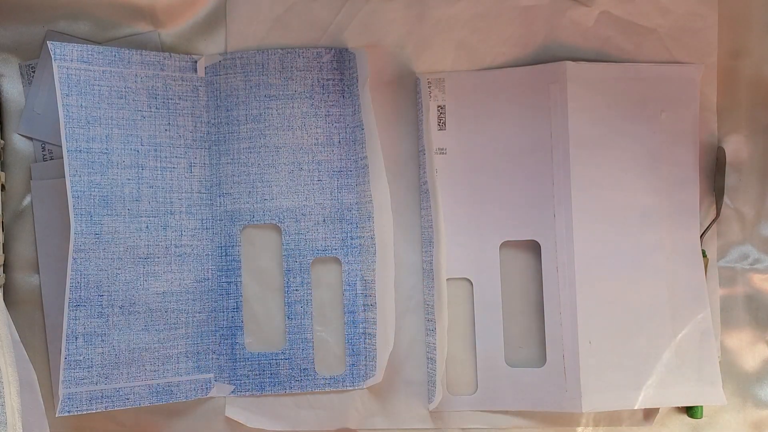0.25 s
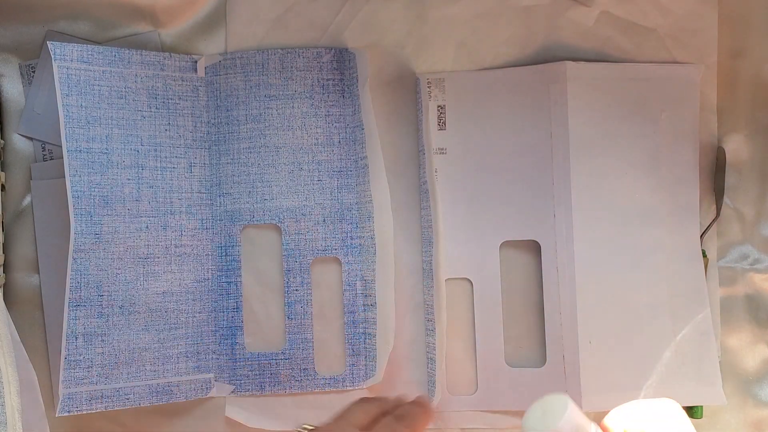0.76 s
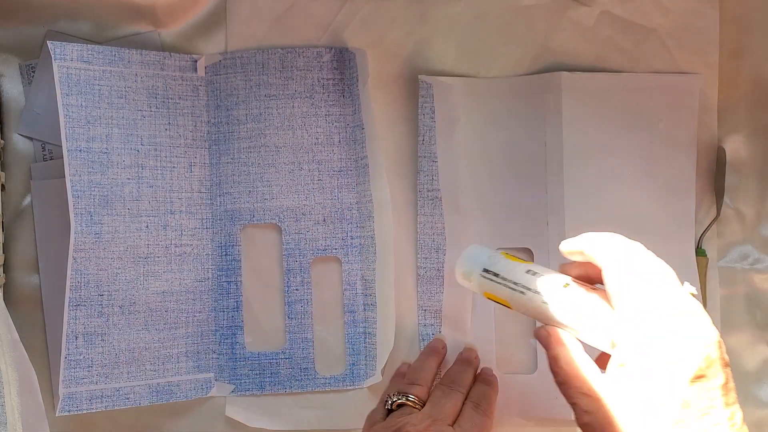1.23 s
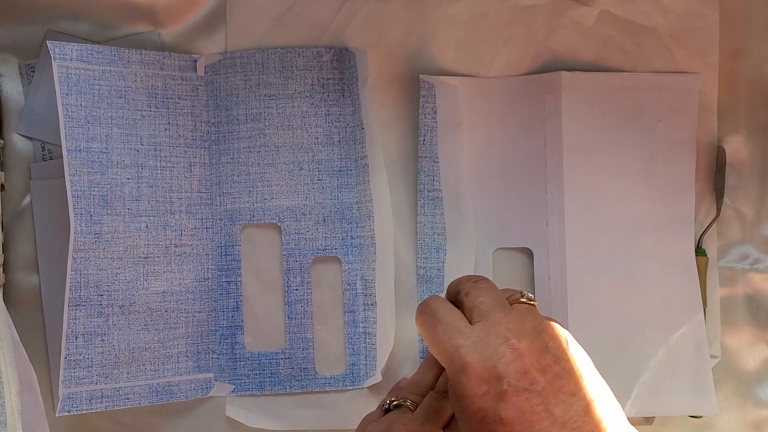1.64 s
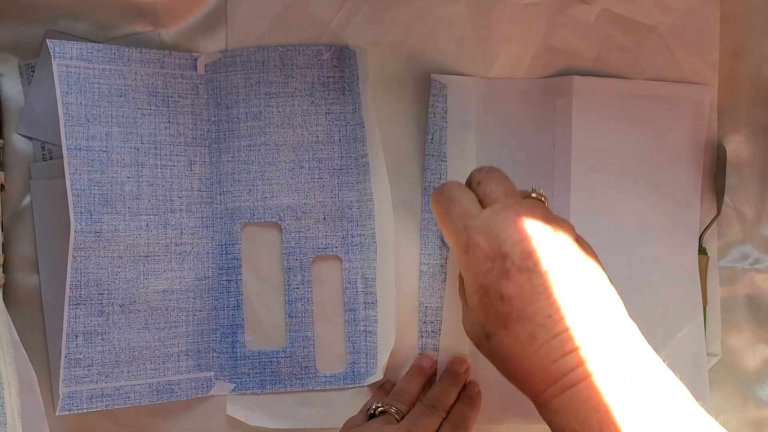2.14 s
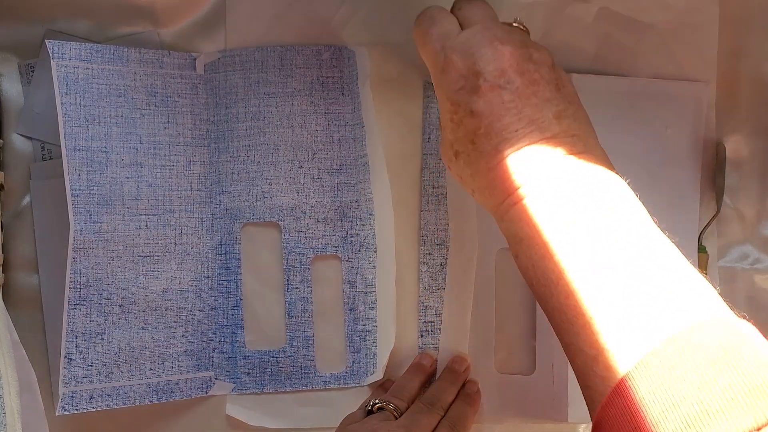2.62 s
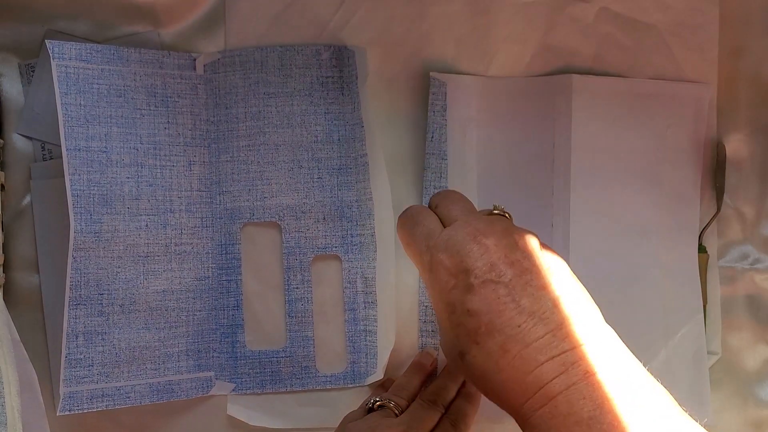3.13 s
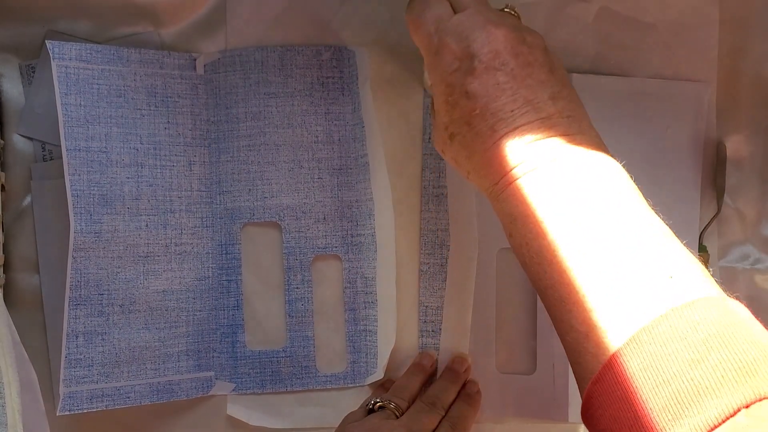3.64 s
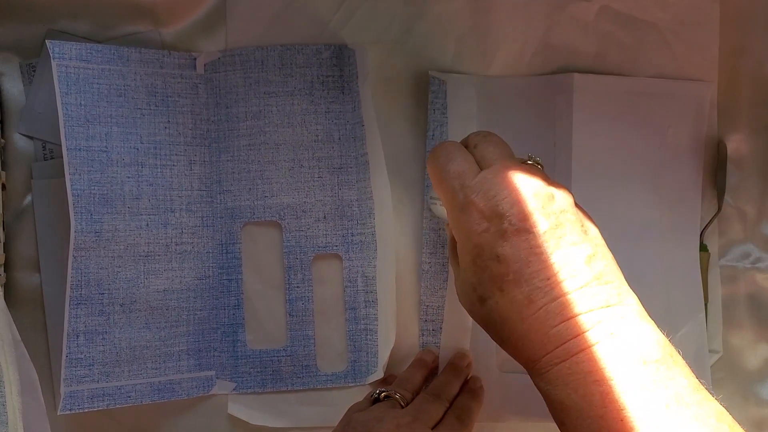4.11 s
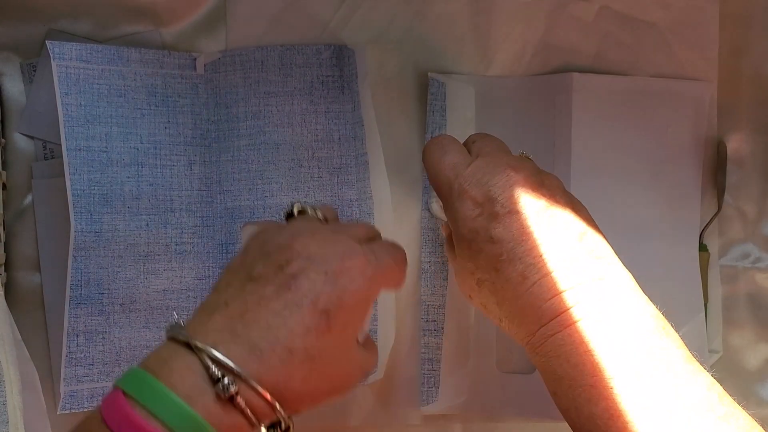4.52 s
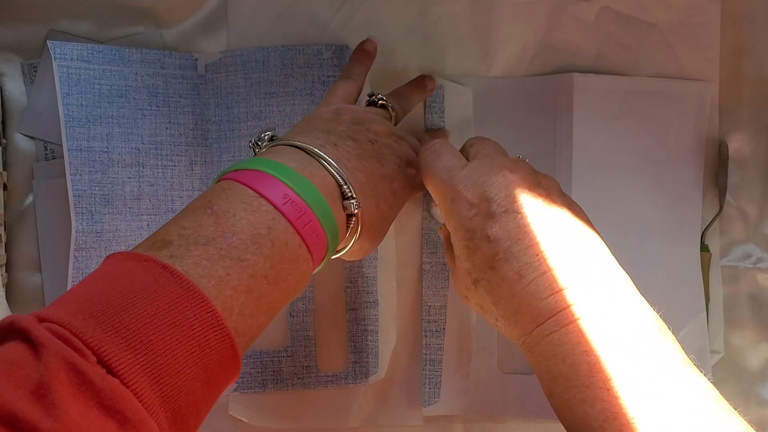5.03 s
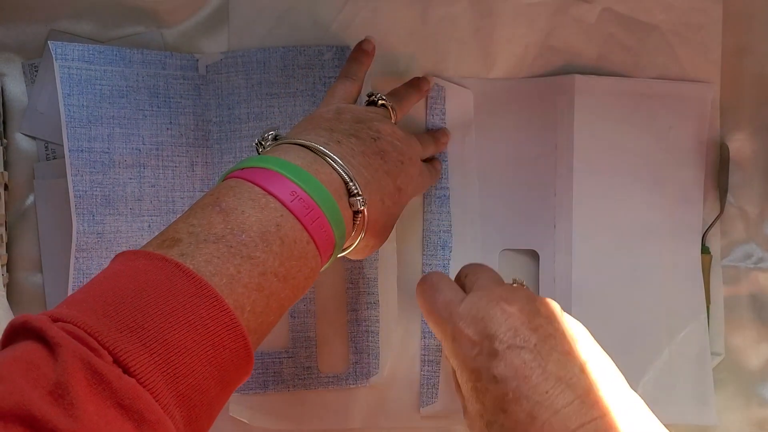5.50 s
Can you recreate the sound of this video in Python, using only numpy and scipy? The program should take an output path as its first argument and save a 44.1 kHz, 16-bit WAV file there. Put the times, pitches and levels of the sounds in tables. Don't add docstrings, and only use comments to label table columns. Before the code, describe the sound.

A glue stick is picked up and drawn along an envelope flap. First come faint paper ticks, a hollow plastic tap and a burst of dry crackling, then scuffs, cloth dragging softly on the table, hard glue clicks, and deep soft thumps as hands land. The sound is close, stereo and dry, with short small-room reflections and a low background hum.

```python
import sys
import numpy as np
from scipy import signal
from scipy.io import wavfile
from scipy.ndimage import uniform_filter1d

SR = 44100
rng = np.random.default_rng(int(sys.argv[2]) if len(sys.argv) > 2 else 0)


def put_to_file(sound):
    columns = np.atleast_2d(sound).T
    safe = np.clip(columns, -1, 1)
    whole_steps = np.round(safe * 32767)
    wavfile.write(sys.argv[1], SR, whole_steps.astype(np.int16))


def convert_level_to_amplitude(level_db):
    exponent = np.asarray(level_db, float) / 20
    return 10 ** exponent


N = 254076

# frequency [Hz], density [dB per Hz].
PAPER_BODY = [(240, -48), (400, -22.5), (895, -24), (1510, -9), (1950, -9), (2280, -8.5), (3130, -5.5),
              (4320, -8), (5790, -7), (8500, -15.5), (11000, -36), (18700, -120)]
# frequency [Hz], density [dB per Hz].
FIBRE_TREBLE = [(4410, -26), (7500, -3), (9220, -12.5), (12700, -5.5), (13900, -7), (15100, -5),
                (16000, -4.5)]

# start [s], length [s], level [dB], treble against the level [dB].
SLIDES = [
    (0.0, 0.13, -73.5, 13),
    (0.497, 0.37, -73, 16),
    (0.91, 0.39, -58, -1.5),
    (2.135, 0.24, -60.5, -11),
    (4.3, 0.75, -70.5, -10),
]
SLIDE_IDLE_DB, SLIDE_IDLE_TREBLE_DB, SLIDE_LOWS_DB = -76, -70.5, -74.5
# start [s], length [s], level [dB], centre [Hz], width [Hz].
SMEAR = (3.5, 1, -78.5, 545, 192)

# start [s], length [s], level [dB].
DRAGS = [
    (0.607, 1.11, -61),
    (1.944, 1.38, -69),
    (4.15, 1.136, -62.5),
]
DRAG_IDLE_DB = -75.5
# frequency [Hz], width [Hz], level [dB].
HOLLOW = [(299.6, 26.4, 8), (250, 55, -17), (385, 92, 0), (2400, 180, -5), (1100, 165, -11)]

# frequency [Hz], density [dB per Hz].
AIR = [(15, -31), (25, -10), (59, -2), (175, -11.5), (217, -11.5), (300, -9.5), (800, -22), (1260, -21),
       (2100, -22.5), (7070, -16), (8320, -50), (9780, -34), (11800, -17.5), (15900, -26)]
AIR_DB = -62
# frequency [Hz], width [Hz], height [dB].
PORT_WHINE = [(12000, 295, 1.5), (15520, 610, 9.5)]
HUM_HZ, HUM_DB = 173.2, -72.5
HUM_START_DB, HUM_RISE_S, HUM_SWELL_DB, HUM_SWELL_S = -14.5, 1.2, 1.5, 2.0
# frequency [Hz], left-right likeness [clipped to -1 to
LIKENESS = [(60, 0.98), (150, 0.25), (380, 0.5), (950, -5.5), (2380, -1), (5980, -0.12), (15000, -0.13)]

# time [s], left against right [dB].
HANDS = [(0.0, 0.5), (0.21, 5), (0.24, -2), (0.71, 3), (1.19, 0), (1.52, 4), (1.89, -2), (1.97, -3),
         (2.09, 0.5), (3.91, -0.5), (3.96, 3.5), (4.04, 2), (4.81, 4), (5.76, 0.5)]
RING_T60, RING_LEFT_DB = 0.025, -14

# time [s], peak [dB], ring [Hz], treble [dB].
SNAPS = [(0.0937, -38, 6850, -4), (0.173, -44, 7040, 5), (0.2353, -44.5, 6660, -7), (0.331, -60, 7420, 18),
         (0.613, -33.5, 7600, 10), (0.8098, -38, 5260, 10), (0.8591, -36.5, 7000, 6.5),
         (0.9455, -38.5, 4300, 1), (2.4612, -36.5, 4370, -6), (4.646, -39.5, 6360, 0.5),
         (4.697, -47.5, 6460, 10), (4.7283, -39.5, 6900, 2), (4.786, -43.5, 6200, 4),
         (5.135, -51, 6030, -1), (4.885, -56.5, 5000, 11.5), (4.989, -42.5, 7100, -3)]
SNAP_T60 = 0.12
# time [s], peak [dB], ring [Hz].
FIBRES = [
    (0.539, -34, 4540),
    (0.5478, -32.5, 4500),
    (0.576, -40, 6960),
    (0.624, -34, 5150),
    (0.6446, -45, 7220),
    (0.6613, -39.5, 7110),
]
FIBRE_TREBLE_DB, FIBRE_T60 = 10.5, 0.056
# time [s], peak [dB], ring [Hz],
# treble [dB], crackle t60 [s].
MIXED_TICKS = [
    (0.4265, -27.5, 2500, -3, 0.045),
    (2.3612, -17.5, 3260, -29, 0.072),
    (3.6968, -26, 1770, -26, 0.022),
    (2.4, -36, 1540, -30, 0.081),
               (0.531, -27, 5200, 0, 0.03), (0.5875, -38, 7000, 8, 0.04), (0.650, -40, 7000, -2, 0.02),
          (0.6655, -37, 7200, 6, 0.03), (0.9752, -44, 5830, 8, 0.08), (1.0326, -36, 5460, 3, 0.05),
          (1.1408, -38, 5500, -1, 0.05), (1.197, -54, 2200, -15, 0.04), (1.3334, -48, 3930, 0, 0.06),
          (1.4541, -51, 6950, 7, 0.04), (2.164, -30, 5800, -2, 0.02), (2.18, -32, 5500, 4, 0.02),
          (2.2302, -19.5, 3220, -26.5, 0.02), (2.355, -28, 7200, -8, 0.015), (2.364, -10, 5160, -23, 0.024),
          (3.1346, -46, 2040, -25, 0.05), (3.256, -33, 3300, -16, 0.024), (3.701, -30, 3060, -3, 0.02),
          (3.807, -41, 1740, -12, 0.02), (3.82, -38, 2900, -8, 0.028), (4.402, -38, 5000, -12, 0.02),
          (4.417, -38, 4000, -15, 0.02), (5.48, -38, 4500, -15, 0.02), (5.529, -49.5, 1030, -30, 0.04),
          (5.58, -50, 1300, -30, 0.027), (0.027, -42, 6500, -8, 0.087), (0.193, -49, 7400, 4, 0.03)]

# time [s], peak [dB], ring [Hz], treble [dB], crackle t60 [s].
TUBE = [
    (.397, -25, 1880, -26, 0.0089),
    (.3975, -24, 2580, -27, 0.025),
    (3.9624, -38.5, 2450, -21, 0.05),
    (3.9635, -45, 1220, -28, 0.065),
    (5.6185, -41, 1110, -30, 0.04),
    (3.2525, -25, 1400, -25, 0.025),
    (1.787, -44, 1330, -30, 0.04),
    (1.806, -44, 1300, -30, 0.04),
]

# time [s], peak [dB], ring [Hz], treble against the peak [dB],
# crackle t60 [s].
CRACKS = [(0.4451, -20, 6000, 7, 0.019), (0.449, -9, 2850, -1, 0.053), (2.3465, -25, 5300, -1.5, 0.13),
          (2.1588, -17.5, 5200, -4, 0.11), (2.2266, -6.5, 3190, -24, 0.036),
          (2.3638, -14, 3260, -25, 0.048), (3.2436, -21, 2930, -16, 0.072),
          (3.6968, -24, 3080, -0.5, 0.038), (2.6718, -34.5, 5700, -4.5, 0.14),
          (3.5757, -36, 6400, -38, 0.05), (4.379, -23.5, 4470, -12, 0.056),
          (4.7805, -36.5, 6440, 9.5, 0.03)]
# time [s], peak [dB], ring [Hz], treble [dB], crackle t60 [s].
RIMS = [
    (1.9872, -31, 2000, -45, 0.089),
    (2.5308, -37, 2270, -7, 0.054),
    (5.5213, -36, 4200, -8, 0.03),
    (5.6173, -30.5, 3480, -33, 0.033),
]

# time [s], peak [dB], upper mode against lower [dB], knock [dB], t60 [s].
THUMPS = [(0.447, -35.5, 9, -3.5, 0.13), (0.495, -32, 11, -9.5, 0.06), (1.209, -51.5, 0, -9, 0.41),
          (1.272, -46.5, 27, -3.5, 0.24), (1.295, -45.5, 14, -29, 0.24), (1.367, -54.5, -11, -12, 0.22),
          (1.873, -48, -5, -5.5, 0.1), (3.247, -46.5, -29, -5, 0.1), (3.788, -52.5, -10, -24, 0.2),
          (4.358, -46.5, 10, -8, 0.11), (4.423, -42.5, -15, -27, 0.17), (4.532, -43.5, 6, -16, 0.069),
          (4.784, -47.5, -26, -3, 0.16)]
# time [s], peak [dB], upper mode [dB], lower mode [Hz], t60 [s].
LANDINGS = [
    (1.653, -29.5, 1.5, 73.5, 0.22),
    (3.1438, -24, -7, 78, 0.17),
    (4.229, -23, 4.5, 60.8, 0.19),
]
PALM_HZ, LANDING_KNOCK_DB = 290, -20
# time [s], knock [dB], knock [Hz].
RAPS = [(0.503, -42.5, 535), (2.226, -54, 314), (2.357, -42, 293), (3.141, -37, 430), (3.697, -48.5, 316),
        (3.82, -54.5, 322), (4.175, -38, 520), (4.23, -53, 480), (4.604, -57, 250), (4.988, -54, 297),
        (5.304, -48.5, 398), (5.468, -44, 570), (5.615, -41, 780)]
RAP_KNOCK_DB, RAP_T60 = 17.5, 0.17
TABLE_HZ = 71.6, 110.1, 156

# start [s], length [s], level [dB], treble against the level [dB].
FLEXES = [
    (0.46, 0.26, -63, 8),
    (0.8, 0.1, -68, 7),
    (0.95, 0.2, -65, 1),
    (1.15, 0.22, -67, -8),
    (1.76, 0.08, -65, -6),
    (3.62, 0.22, -68, -8),
    (4.34, 0.09, -62, -8),
    (4.63, 0.2, -71, 4),
]
CREASES_PER_S, CREASE_SPREAD_DB, CREASE_S = 400, 2.6, 0.0012

# time [s], peak [dB], ring [Hz], treble against the peak [dB],
# t60 [s].
SCUFFS = [(0.4928, -28, 1420, 4.5, 0.098), (0.5244, -27, 5660, -12, 0.22), (0.5368, -30, 4600, 1, 0.1),
          (0.5764, -38, 6960, 6.5, 0.16), (0.6246, -44, 5200, 9, 0.22), (0.6404, -27, 7700, -1.5, 0.2),
          (0.826, -42, 5420, 1, 0.11), (0.9645, -39.5, 5820, -4, 0.28), (1.027, -34.5, 2680, 0.5, 0.17),
          (1.1405, -36.5, 3330, -10, 0.19), (1.04, -40, 1310, -18, 0.094), (1.19, -39.5, 2040, -20, 0.26),
          (1.2341, -42, 1160, -2, 0.29), (1.3337, -45, 1680, 2, 0.18), (1.4795, -41, 6960, -13, 0.11),
          (1.7629, -38.5, 5770, -6, 0.33), (1.779, -36.5, 1370, -6, 0.087), (1.786, -36, 6000, -10, 0.1),
          (1.798, -41, 1330, -20, 0.14), (3.243, -27, 2470, -17, 0.029), (3.8047, -37.5, 1790, -11, 0.057),
          (4.3444, -41, 3520, -8.5, 0.15), (4.3844, -28, 4320, -27, 0.073)]

# time [s], peak [dB], ring [Hz], crackle t60 [s].
TACKS = [(1.868, -38.5, 1780, 0.046), (1.895, -46.5, 1500, 0.025), (2.1096, -40, 5040, 0.085),
         (2.1224, -42.5, 3300, 0.4), (2.485, -50.5, 1650, 0.16), (2.598, -49.5, 1600, 0.18),
         (2.688, -46.5, 1140, 0.15), (2.7425, -42, 1870, 0.14), (2.8578, -40.5, 3160, 0.15),
         (3.1475, -38, 1920, 0.092), (3.2165, -48.5, 3250, 0.4), (3.349, -45, 5250, 0.15),
         (3.4323, -46, 1820, 0.12), (3.4537, -49, 1820, 0.1), (3.5956, -46, 1670, 0.033),
         (3.641, -46.5, 1770, 0.11), (3.6614, -40, 1100, 0.16), (3.675, -46, 1310, 0.038),
         (3.788, -36, 1080, 0.11), (3.823, -47, 1780, 0.04), (3.9048, -56, 2320, 0.065),
         (4.359, -36, 3600, 0.2), (4.606, -53, 1070, 0.14), (4.913, -54, 2350, 0.03),
         (4.955, -51, 1010, 0.26), (5.109, -65, 1054, 0.07), (5.237, -57, 1530, 0.059),
         (5.3047, -49, 1930, 0.035), (5.5558, -46.5, 1260, 0.073)]
TACK_TREBLE_DB, TACK_TREBLE_DB_PER_OCTAVE = -6, 4.5
# time [s], peak [dB], ring [Hz], crackle t60 [s].
DABS = [(2.2058, -32, 2800, 0.04), (3.0982, -43, 2120, 0.12), (3.6288, -52, 1790, 0.077),
        (3.7724, -46, 3200, 0.061), (4.167, -34.5, 2230, 0.055), (4.1755, -28, 1700, 0.056),
        (4.2297, -43, 1500, 0.089), (4.243, -29.5, 2170, 0.056), (4.262, -43, 3000, 0.032),
        (5.369, -51, 3270, 0.062), (5.462, -28.5, 3430, 0.045), (5.4724, -30.5, 3560, 0.048)]
DAB_TREBLE_DB = -43

# frequency [Hz], t60 [s].
ROOM = [(200, 0.216), (1000, 0.16), (4000, 0.14), (12000, 0.18)]
ROOM_DB, NEAR_DB, PATHS_PER_S = -4.5, -11.5, 7
# frequency [Hz],
# gain [dB].
RESPONSE = [(20, -22), (45, 3.5), (70, 3), (810, -1), (930, -3), (1100, -0.5), (7700, -8), (8300, -13.5),
            (10200, -7.5), (11200, -6), (15700, -3), (16200, -27), (22050, -16)]
RIGHT_TREBLE_DB = 3

TICK = dict(rise=0.00043, front_db=-2.5, crack_db=-12.0, spread_db=3.0, ring_db=-3.0, sharp=8.0,
            apart=0.76, creak_db=-7.0)
CRACK = dict(rise=0.0004, front_db=1.5, crack_db=14.0, spread_db=2.5, ring_db=-0.5, sharp=5.5,
             apart=1.0, creak_db=-7.0)
TAP = dict(rise=0.0024, front_db=2.5, crack_db=-22, spread_db=1.0, ring_db=15, sharp=9.5,
           apart=0.38, creak_db=-18.0)
RUB = dict(rise=0.012, front_db=-41, crack_db=-17.0, spread_db=1.0, ring_db=-8.5, sharp=6.6,
           apart=1.0, creak_db=-4.0)


def evened(x):
    return x / np.sqrt(np.mean(x ** 2) + 1e-20)


def read(points, hz):
    f, value = np.transpose(points)
    return np.interp(np.log(hz + 1), np.log(f + 1), value)


def add(mix, s, sound):
    part = mix[..., round(s * SR):][..., :sound.shape[-1]]
    part += sound[..., :part.shape[-1]]


def colour(x, points, tilt_db=0):
    hz = abs(np.fft.fftfreq(4096, 1 / SR))
    below = np.maximum(np.log2(points[0][0] / (hz + 1)), 0)
    above = np.maximum(hz / points[-1][0] - 1, 0) * 10
    tilt = np.clip(tilt_db, -7, 9) * np.log2(np.clip(hz, 600, 9000) / 2500)
    gain_db = np.maximum(read(points, hz) - 20 * (below + above) + tilt, -100)
    log_gain = gain_db * np.log(10) / 20
    taps = np.fft.ifft(np.exp(np.conj(signal.hilbert(log_gain)))).real
    return signal.fftconvolve(np.atleast_2d(x), taps[None, :2048], axes=1)[:, :x.shape[-1]]


def resonate(x, hz, width):
    r = np.exp(-np.pi * width / SR)
    return 2 * signal.lfilter([1 - r], [1, -r * np.exp(2j * np.pi * hz / SR)], x).real


def stroke_of(start, length, edge):
    u = (np.arange(N) / SR - start) / length
    return np.sin(np.pi / 2 * np.clip(np.minimum(u, 1 - u) / edge, 0, 1)) ** 2


def grit(n, spread_db, apart=0):
    clumps = np.repeat(rng.exponential(1, n // 24 + 1), 24)[:n]
    fibres = rng.standard_normal(n) + apart * rng.standard_normal((2, n))
    return evened(fibres * convert_level_to_amplitude(spread_db * np.minimum(clumps, 4)))


def spread(magnitude):
    a, b, c, d = rng.standard_normal((magnitude.shape[1], 1025, 4)).T
    same = np.clip(read(LIKENESS, np.fft.rfftfreq(2048, 1 / SR)), -1, 1)[:, None]
    left = a + 1j * b
    right = same * left + np.sqrt(1 - same ** 2) * (c + 1j * d)
    z = np.array([left, right]) * magnitude
    return evened(signal.istft(z, nperseg=2048, noverlap=1536)[1][:, :N])


def slide():
    level, treble = convert_level_to_amplitude(SLIDE_IDLE_DB), convert_level_to_amplitude(SLIDE_IDLE_TREBLE_DB)
    for s, length, db, up_db in SLIDES:
        level = level + convert_level_to_amplitude(db) * stroke_of(s, length, 0.46)
        treble = treble + convert_level_to_amplitude(db + up_db) * stroke_of(s, length, 0.5)
    drive = grit(N, 2.8, apart=1.0)
    body = evened(colour(drive, PAPER_BODY))
    lows = evened(resonate(drive, 1020, 1200))
    start, length, db, hz, width = SMEAR
    smeared = evened(resonate(resonate(drive, hz, width), hz, width))
    smear = convert_level_to_amplitude(db) * stroke_of(start, length, 0.35) * smeared
    fibres = evened(colour(drive, FIBRE_TREBLE))
    return level * body + treble * fibres + convert_level_to_amplitude(SLIDE_LOWS_DB) * lows + smear


def sleeve():
    drag = spread(np.ones((1025, N // 512 + 5))) + 1.04 * rng.standard_normal(N)
    hollow = sum(convert_level_to_amplitude(db) * resonate(drag, hz, width) / np.sqrt(width) for hz, width, db in HOLLOW)
    level = convert_level_to_amplitude(DRAG_IDLE_DB) + sum(convert_level_to_amplitude(db) * stroke_of(s, length, 0.3) for s, length, db in DRAGS)
    return level * evened(hollow)


def air():
    patches = rng.standard_normal((N // 512 + 5, 1025)).T
    patches = uniform_filter1d(patches, size=20, axis=0)
    patches = evened(uniform_filter1d(patches, size=6, axis=1))
    bins_hz = np.fft.rfftfreq(2048, 1 / SR)
    whine_db = sum(db * np.exp(-((bins_hz - hz) / width) ** 2) for hz, width, db in PORT_WHINE)
    shape_db = read(AIR, bins_hz) + whine_db
    noise = spread(convert_level_to_amplitude(shape_db[:, None] + 1.83 * patches))
    t = np.arange(N) / SR
    waver = 0.3 * evened(resonate(rng.standard_normal(N), HUM_HZ, 6))
    hum = evened(np.sin(2 * np.pi * HUM_HZ * t) + waver)
    rise_db = HUM_START_DB * np.maximum(1 - t / HUM_RISE_S, 0)
    swell_db = HUM_SWELL_DB * np.cos(2 * np.pi * (t - 2.57) / HUM_SWELL_S)
    return convert_level_to_amplitude(AIR_DB) * noise + convert_level_to_amplitude(HUM_DB + rise_db + swell_db) * hum


def paper(drive, damped, hz, treble_db, tilt_db, ring_db, sharp):
    body = colour(drive, PAPER_BODY, tilt_db)
    dull_db = np.clip(-0.2 * (treble_db + 13.0), 0, 3.5)
    width = hz / sharp
    push = body * damped
    rings = resonate(push, hz, width) + convert_level_to_amplitude(-14.0) * resonate(push, 1.67 * hz, width)
    low = evened(body) + convert_level_to_amplitude(ring_db + dull_db) * evened(rings)
    return evened(low) + convert_level_to_amplitude(treble_db) * evened(colour(drive, FIBRE_TREBLE))


def contacts(rows, lean_db, lean_db_per_octave, rise, front_db, crack_db, spread_db, ring_db, sharp, apart, creak_db):
    lead = 220
    out, t = np.zeros((2, N)), (np.arange(6000) - lead) / SR
    lead_in = convert_level_to_amplitude(creak_db + 60 * t / 0.043) * (t < 0) * np.clip(1 + t * SR / lead, 0, 1)
    swell = np.sin(np.pi / 2 * np.clip(t / max(rise, 1 / SR), 0, 1)) ** 2
    late = np.maximum(t - rise, 0)
    front = convert_level_to_amplitude(front_db - 60 * late / 0.0069)
    damped = convert_level_to_amplitude(RING_LEFT_DB) + convert_level_to_amplitude(-60 * late / RING_T60)
    for s, db, hz, treble_db, t60 in rows:
        tilt_db = lean_db + lean_db_per_octave * np.log2(hz / 2500)
        stroke = lead_in + swell * (convert_level_to_amplitude(-60 * late / max(t60, 0.01)) + front)
        side = convert_level_to_amplitude(np.interp(s, *np.transpose(HANDS)) * np.array([[0.5], [-0.5]]))
        grains = grit(len(t), spread_db, apart)
        grains[:, lead + 8] += convert_level_to_amplitude(crack_db)
        grains[1] = np.roll(grains[1], rng.integers(-1, 2))
        size = convert_level_to_amplitude(db - 12.0) * np.sqrt(np.mean(stroke ** 2))
        sound = paper(stroke * grains, damped, hz, treble_db, tilt_db, ring_db, sharp)
        add(out, s - lead / SR, size * side * sound)
    return out


def snaps():
    flap = [(*row, SNAP_T60) for row in SNAPS]
    fibres = [(*row, FIBRE_TREBLE_DB, FIBRE_T60) for row in FIBRES]
    return contacts(flap + fibres + MIXED_TICKS, 0.41, 5.1, **TICK)


def tube_taps():
    return contacts(TUBE, -5, 0.3, **TAP)


def cracks():
    return contacts(CRACKS, 0.86, 0.3, **CRACK) + contacts(RIMS, -3.0, 1.5, **CRACK)


def thumps():
    out, t = np.zeros((2, N)), np.arange(12000) / SR
    hands = [(*row, PALM_HZ, TABLE_HZ[0]) for row in THUMPS]
    landings = [(s, db, upper_db, LANDING_KNOCK_DB, t60, PALM_HZ, hz) for s, db, upper_db, hz, t60 in LANDINGS]
    raps = [(s, db - RAP_KNOCK_DB, 0, RAP_KNOCK_DB, RAP_T60, hz, TABLE_HZ[0]) for s, db, hz in RAPS]
    for s, db, upper_db, knock_db, t60, knock_hz, low_hz in hands + landings + raps:
        low, upper, top = (np.sin(2 * np.pi * hz * (t - 0.0065)) for hz in (low_hz, *TABLE_HZ[1:]))
        press = np.minimum(t / 0.00846, 1) ** 2 * convert_level_to_amplitude(-60 * t / max(t60, 0.03))
        modes = press * (low + convert_level_to_amplitude(upper_db - 70 * t) * upper + convert_level_to_amplitude(-2 - 60 * t / 0.18) * top)
        blow = rng.standard_normal(len(t)) * np.minimum(t / 0.0029, 1) * convert_level_to_amplitude(-60 * t / 0.086)
        knock = 0
        for hz, share in ((knock_hz, 1), (1.84 * knock_hz, 0.35)):
            knock = knock + share * resonate(resonate(blow, hz, 0.35 * hz), hz, 1.23 * hz)
        modes = np.array([modes, np.roll(modes, round(0.00018 * SR))])
        knock = np.array([knock, np.roll(knock, round(0.00047 * SR))])
        add(out, s, convert_level_to_amplitude(db) * (modes / abs(modes).max() + convert_level_to_amplitude(knock_db) * knock / abs(knock).max()))
    return out * convert_level_to_amplitude([[-0.3], [0.3]])


def creases():
    sizes = convert_level_to_amplitude(CREASE_SPREAD_DB * np.minimum(rng.exponential(1, N), 3))
    starts = (rng.random(N) < CREASES_PER_S / SR) * sizes
    bursts = signal.lfilter([1], [1, -np.exp(-1 / (CREASE_S * SR))], starts)
    drive = bursts * (rng.standard_normal(N) + 0.9 * rng.standard_normal((2, N)))
    level = sum(convert_level_to_amplitude(db) * stroke_of(s, length, 0.3) for s, length, db, _ in FLEXES)
    treble = sum(convert_level_to_amplitude(db + up_db) * stroke_of(s, length, 0.3) for s, length, db, up_db in FLEXES)
    return level * evened(colour(drive, PAPER_BODY)) + treble * evened(colour(drive, FIBRE_TREBLE))


def scuffs():
    return contacts(SCUFFS, 1.35, 5.4, **RUB)


def tacks():
    rows = []
    for s, db, hz, t60 in TACKS:
        treble_db = TACK_TREBLE_DB + TACK_TREBLE_DB_PER_OCTAVE * np.log2(hz / 2500)
        rows.append((s, db, hz, treble_db, t60))
    return contacts(rows, -1.9, 1.5, **TICK)


def dabs():
    rows = [(s, db, hz, DAB_TREBLE_DB, t60) for s, db, hz, t60 in DABS]
    return contacts(rows, -4.5, 0.22, **TICK)


def room(x):
    n = SR // 4
    out, turn = np.zeros((2, N)), np.arange(N) / SR * PATHS_PER_S
    for k in range(3):
        taps = np.zeros((2, n))
        at = np.arange(40, n - 20, 20) + rng.integers(0, 20, (2, (n - 41) // 20))
        np.put_along_axis(taps, at, rng.choice([-1., 1.], at.shape), 1)
        near = taps * convert_level_to_amplitude(-60 * np.arange(n) / SR / 0.011)
        hz, t, z = signal.stft(taps, SR, nperseg=256)
        decay = convert_level_to_amplitude(-60 * t / read(ROOM, hz)[:, None])
        tail = signal.istft(z * decay, SR, nperseg=256)[1][:, :n]
        echo = convert_level_to_amplitude(NEAR_DB) * near / np.linalg.norm(near[0]) + convert_level_to_amplitude(ROOM_DB) * tail / np.linalg.norm(tail[0])
        share = np.sqrt(2 / 3) * np.cos(np.pi * (turn + k) / 3)
        out += signal.oaconvolve((share * x)[None], echo, axes=1)[:, :N]
    return out


def scene():
    strokes = slide() + creases() + scuffs()
    clicks = snaps() + tube_taps() + cracks() + tacks() + dabs()
    sheet = strokes + clicks
    return sheet + room(sheet.mean(0)) + thumps() + sleeve() + air()


def roll_off(x):
    return signal.sosfilt(signal.butter(12, 17170, fs=SR, output="sos"), x)


def record(dry):
    heard = colour(dry, RESPONSE)
    treble = signal.lfilter(*signal.butter(2, 6500, "high", fs=SR), heard)
    balance = convert_level_to_amplitude([[-RIGHT_TREBLE_DB / 2], [RIGHT_TREBLE_DB / 2]])
    heard = heard + treble * (balance - 1)
    return roll_off(heard)


dry = scene()
out = record(dry)
put_to_file(out)
```